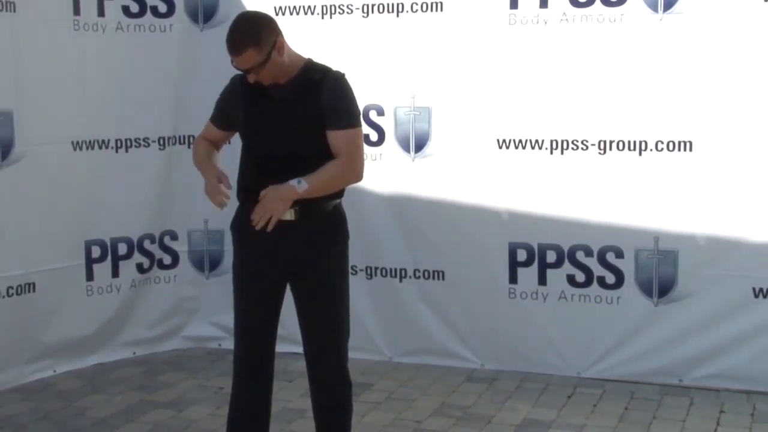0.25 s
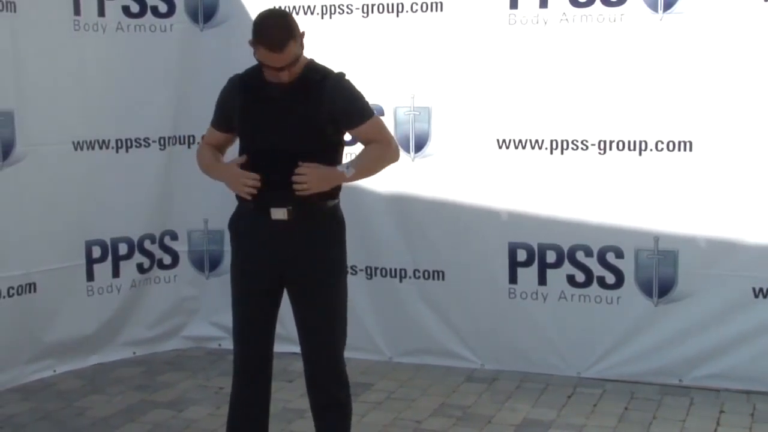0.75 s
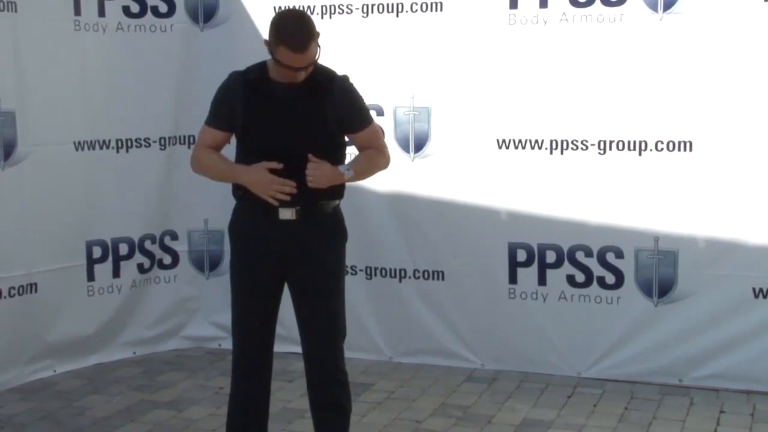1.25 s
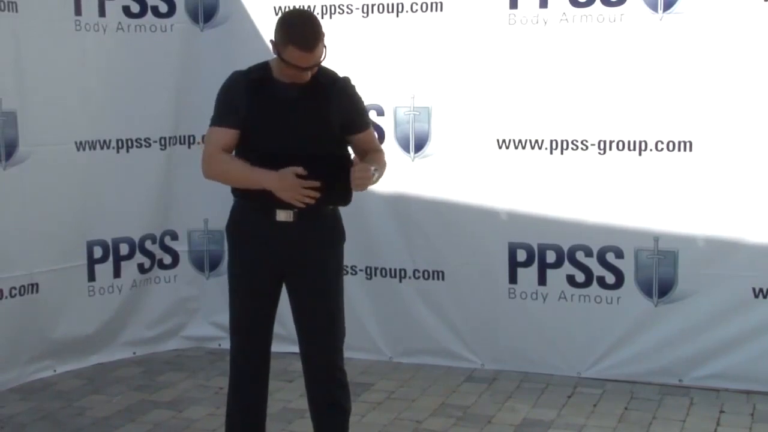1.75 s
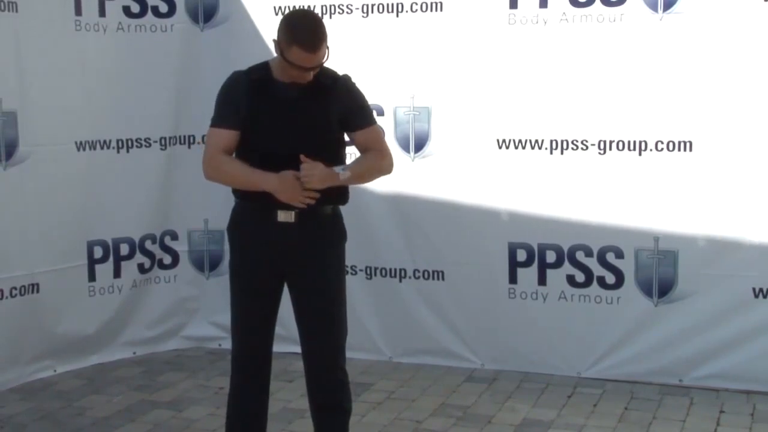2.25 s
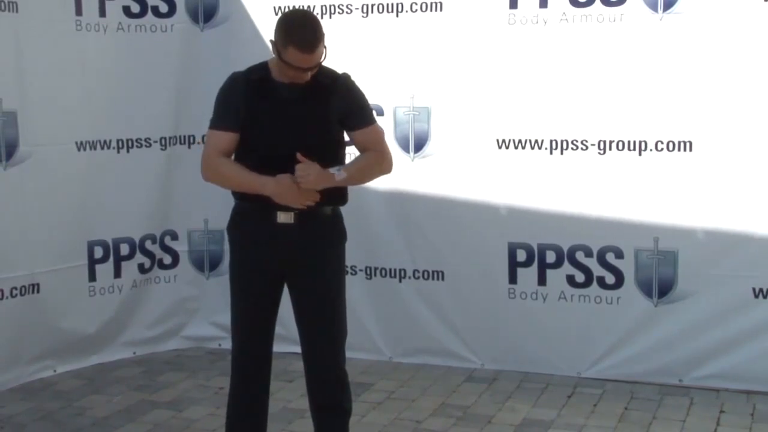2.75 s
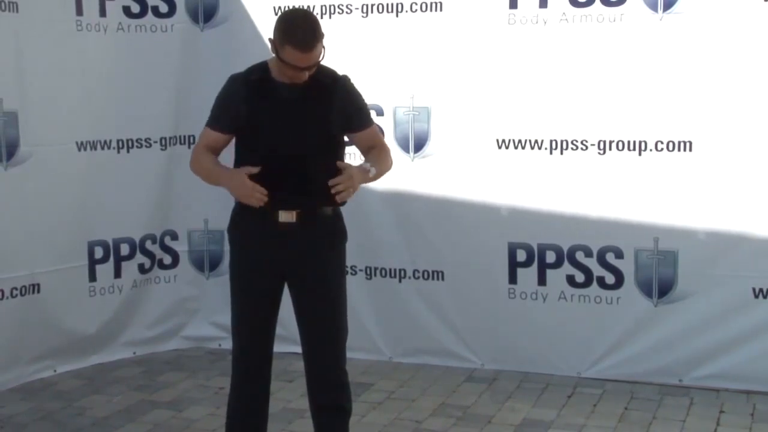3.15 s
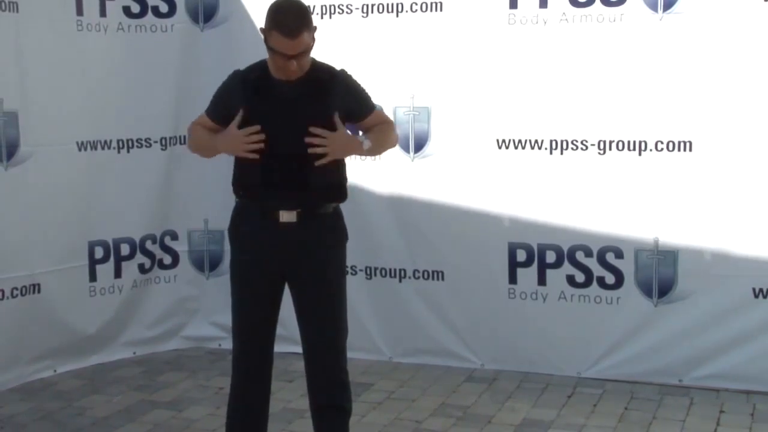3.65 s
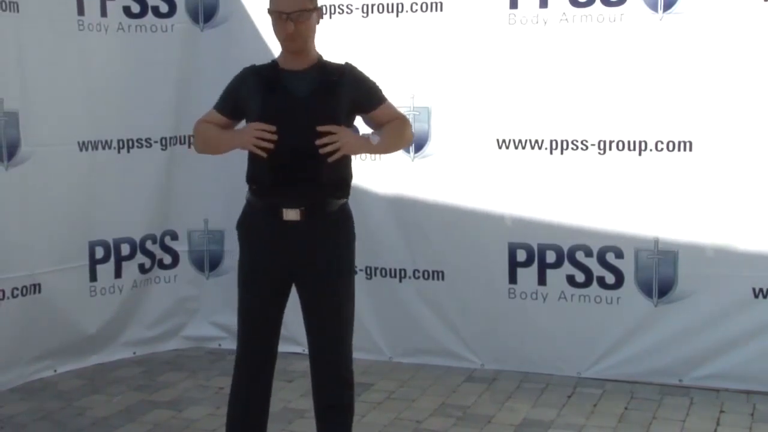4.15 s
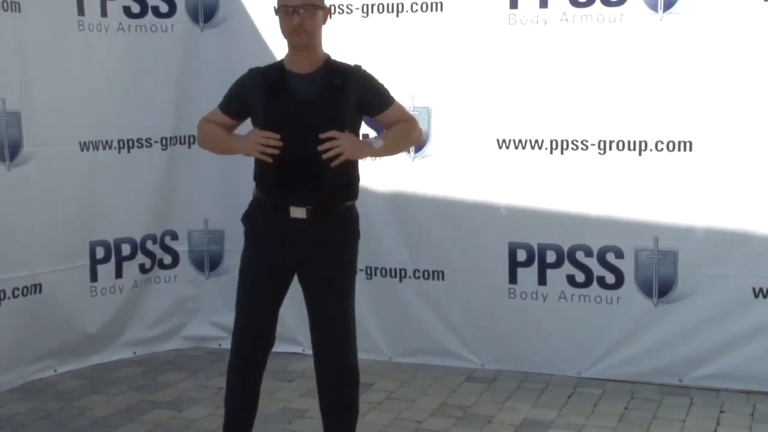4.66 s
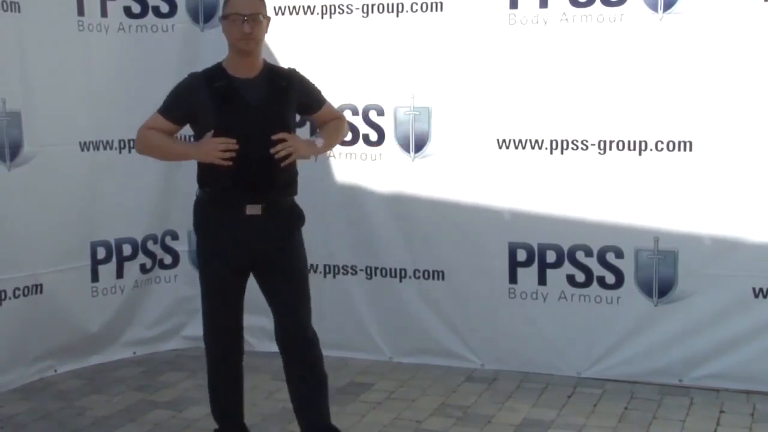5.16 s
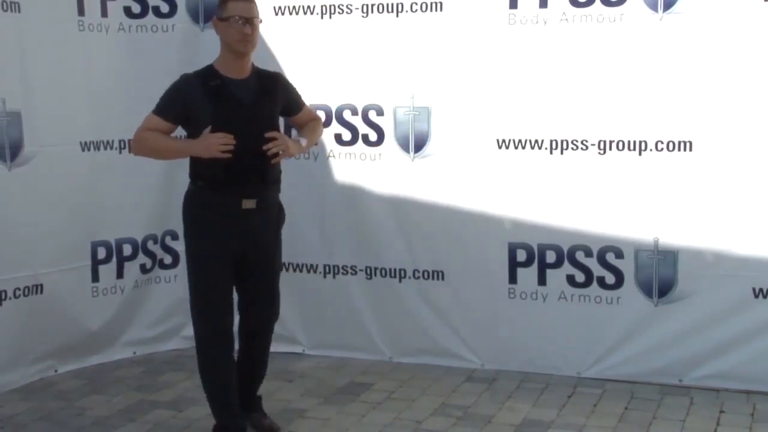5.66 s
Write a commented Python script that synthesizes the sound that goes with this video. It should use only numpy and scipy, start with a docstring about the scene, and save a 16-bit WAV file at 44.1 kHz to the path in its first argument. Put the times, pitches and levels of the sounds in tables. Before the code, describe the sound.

Palms slap a stiff padded vest with hollow thumps, and a hook-and-loop strap crackles and rips open amid knocks, cloth rustle and faint traffic.

```python
"""Palms slap the hollow shell of a stiff padded vest; a hook-and-loop strap is picked loose and ripped open,
knocks fall and cloth rustles, in a paved, tarp-walled corner with far traffic humming.
The shell is a bank of damped sines; strap and cloth are many tiny slips or rings, shaped in spectrum and level.
Echoes and a short tail place hits and tearing in the corner; loud slaps overload the input stage."""
import sys
import numpy as np
from scipy import signal
from scipy.fft import rfft, irfft, next_fast_len
from scipy.io import wavfile
from scipy.ndimage import uniform_filter1d, map_coordinates

SR = 44100
rng = np.random.default_rng(int(sys.argv[2]) if len(sys.argv) > 2 else 0)


def to_wav(sig):
    """Store sig (one row per channel, or 1-D mono) as 16-bit WAV at the path in sys.argv[1].

    Samples outside -1..1 are clipped; the rate is SR.
    """
    pcm = np.clip(np.atleast_2d(sig), -1, 1) * 32767
    pcm = np.round(pcm).astype(np.int16)
    wavfile.write(sys.argv[1], SR, pcm.T)  # frames by channels


N = 260631  # length in samples

# the strap is pulled, slackens and is pulled harder: t/s, hooks level/dB
RIP_PULL = [(1.315, -53), (1.324, -32.5), (1.379, -25), (1.47, -30.5), (1.494, -28.5), (1.499, -22.5),
            (1.54, -23.5), (1.611, -17.5), (1.651, -19), (1.668, -28)]
# sliding and fraying cloth, spectrum before scaling: f/Hz, level/dB per Hz
CLOTH_SPECTRUM = [(880, -15), (1500, -1), (1680, -2.5), (2080, -1), (4860, -0.5), (6870, -2), (7790, -0.5),
                  (12000, -9), (15000, -17.5)]
# foam padding, spectrum before scaling: f/Hz, level/dB per Hz
PADDING_SPECTRUM = [(50, -85.5), (90, -20), (170, -9), (280, -1.5), (400, 2), (650, -2), (1000, -10),
                    (1600, -23), (3000, -22), (8000, -55)]
# small contacts through the microphone, bass cut, rolled off above about 13 kHz: f/Hz, gain/dB
MIC_RESPONSE = [(90, -29), (200, 5), (9000, 2), (12000, 6.5), (14000, -9.5), (16000, -33.5)]


def slaps():
    """The palm pushes, so the shell's ring swells, holds and is choked; skin smacks, padding rasps, the chest thuds."""
    # palm slaps: t/s, ring level/dB, tension/pitch factor, rise time constant/s, hold/s,
    # smack level/dB, padding level/dB, chest thud level/dB
    hits = [(0.572, 0, 1.046, 0.0049, 0.012, -16, -12.5, -20),
            (0.9561, -21, 1.033, 0.0019, 0.0066, -43, -33.5, -59),
            (3.5393, -5.5, 0.915, 0.001066, 0.0032, -13.5, -14, -20.5),
            (3.556, 1.5, 0.93, 0.0005, 0.0063, -17.5, -16.5, -25.5)]
    # modes of the hollow shell: f/Hz before tension, level/dB re ring, t60/s
    modes = [(296, -15, 0.0039), (382.8, 1, 0.0095), (555.2, -15, 0.01), (651, -19.5, 0.0076),
             (863, -14.5, 0.025), (1219, -20, 0.045)]
    # skin on nylon, spectrum before scaling: f/Hz, level/dB per Hz
    skin_spectrum = [(100, -26), (500, -10.5), (1200, 3), (2500, -2.5), (4500, -7), (9000, -8.5),
                     (11500, -13), (14000, -32), (16000, -50.5)]
    thud_t60_s = .05

    ringing, rest = np.zeros(N + SR), np.zeros(N + SR)
    t = np.arange(SR // 4) / SR
    skin = coloured(rng.standard_normal(N), skin_spectrum)
    foam = coloured(rng.standard_normal(N), PADDING_SPECTRUM)
    for s, db, tension, rise, hold, smack_db, padding_db, thud_db in hits:
        at = round(s * SR)
        span = slice(at, at + len(t))
        push = (1 - np.exp(-t / rise)) ** 2
        after = np.maximum(t - hold, 0)  # decay starts only after the hold
        ring = sum(amp(level - 60 * after / t60) * np.sin(2 * np.pi * hz * tension * t)
                   for hz, level, t60 in modes)

        flat = t - 1.7 * rise  # the palm lands flat near the end of the push
        smack_decay = amp(-60 * flat / 0.012) + 0.28 * amp(-60 * flat / 0.085)
        smack = amp(smack_db) * (flat > 0) * smack_decay * skin[span]
        rasp = amp(padding_db - 60 * after / 0.065) * foam[span]
        chest = 0.76 * np.sin(2 * np.pi * 58 * t) + 1.5 * np.sin(2 * np.pi * 128 * t)
        thud = amp(thud_db - 60 * t / thud_t60_s) * chest

        ringing[span] += push * amp(db) * ring
        rest[span] += smack + push * (rasp + thud)
    return ringing[:N], rest[:N]


def rip():
    """Thousands of hooks let go each second, in clumps; larger tufts flap the strap, jerks shake the padding."""
    # tearing hooks, spectrum before scaling: f/Hz, level/dB per Hz
    tear_spectrum = [(700, -64.5), (1800, -19), (3000, -11), (4000, -12), (5500, -9), (8300, -4.5),
                     (10500, -7.5), (12900, -12), (16000, -25)]
    # flapping strap, spectrum before scaling: f/Hz, level/dB per Hz
    strap_spectrum = [(200, -70.5), (500, -18), (800, -10), (1000, -9), (1250, 4.5), (1500, 3), (2200, 4.5),
                      (3200, 0.5), (5000, -7), (9000, -71)]
    # start levels re hooks; both grow as the freed end grows longer
    flap_db, flap_grows_db_per_s = -8, 17
    shake_db, shake_grows_db_per_s = -28, 25.5

    start_s, end_s = RIP_PULL[0][0], RIP_PULL[-1][0]
    share = np.sqrt((end_s - start_s) * SR / N)  # keeps rms 1 within the tearing
    clumps = amp(2.2 * wobble(200) + .8 * wobble(50))
    fine = hooks(per_s=5000, centre_hz=6100, octaves=1.44, cycles=1.93, spread_db=-0.5) * clumps
    tufts = hooks(per_s=1800, centre_hz=1336, octaves=1.8, cycles=1.8, spread_db=2.0) * clumps
    jerks = hooks(per_s=420, centre_hz=348, octaves=1.48, cycles=1.3, spread_db=3.0) * clumps
    tear = share * coloured(fine, tear_spectrum)
    flap = share * coloured(tufts, strap_spectrum)
    shake = share * coloured(jerks, PADDING_SPECTRUM)

    torn_s = np.clip(np.arange(N) / SR - start_s, 0, 1)
    flap_gain = amp(flap_db + flap_grows_db_per_s * torn_s)
    shake_gain = amp(shake_db + shake_grows_db_per_s * torn_s)
    return gains(RIP_PULL, fade=.004) * (tear + flap_gain * flap + shake_gain * shake)


def hooks(per_s, centre_hz, octaves, cycles, spread_db):
    """Each hook that lets go rings a few cycles at its own pitch and size, while the strap tears."""
    start, end = RIP_PULL[0][0] - .01, RIP_PULL[-1][0] + .01
    when, pitch, size, sign = rng.random((int(per_s * (end - start)), 4)).T
    # octaves reaches either way from the centre
    hz = np.minimum(centre_hz * 2 ** (octaves * (2 * pitch - 1)), SR / 3)[:, None]
    t = np.arange(256) / SR
    decay = np.exp(-t * hz * np.log(10) / cycles)  # 20 dB down after this many cycles
    rings = np.sin(2 * np.pi * hz * t) * decay
    size_gain = amp(-spread_db * np.log(1 - .96 * size))
    rings *= (np.sign(sign - .5) * size_gain)[:, None]
    at = ((start + when * (end - start)) * SR).astype(int)[:, None] + np.arange(len(t))
    return np.bincount(at.ravel(), rings.ravel(), N)[:N]


def picking():
    """Fingers pick at the strap's edge; a few rows of hooks part in short crackling runs."""
    # picks: t/s of arrival at full speed, rise/s, hold/s, hooks level/dB
    picks = [(1.018, .03, 0.031, -43), (1.07, .02, 0.038, -45.5), (1.139, .02, 0.021, -45),
             (1.186, .01, .01, -47), (1.219, .01, 0.038, -40.5), (1.306, .003, .013, -41)]
    # parting hooks, spectrum before scaling: f/Hz, level/dB per Hz
    parting_spectrum = [(530, -45), (900, -21), (1170, -6), (1350, -17), (1470, -10), (1930, -9.5),
                        (7590, 1.5), (12400, -13), (15500, -21)]

    slips = crackle(per_s=2500, spread_db=-2, hiss=0.86)
    fizz = coloured(slips * amp(2.0 * wobble(80)), parting_spectrum)
    power = sum(amp(2 * (db + motion_db(s, rise, hold))) for s, rise, hold, db in picks)
    return fizz * np.sqrt(power)


def snaps():
    """A single hook or crease snaps in a broad click round its pitch; neighbouring hooks fray after it."""
    # single hooks and creases: t/s, click level/dB, f/Hz
    clicks = [(0.02, -38, 7020), (0.0842, -42, 6860), (0.205, -43.5, 6820), (0.252, -34.5, 4500),
              (0.2898, -34, 5380), (0.9952, -32, 6700), (1.0085, -32, 6240), (1.019, -27.5, 7100),
              (1.037, -26, 6630), (1.0763, -29, 5740), (1.1036, -31, 8000), (1.1437, -31, 7000),
              (1.1585, -28, 6900), (1.1897, -28, 7500), (1.2188, -30, 5670), (1.2251, -25.5, 7840),
              (1.2368, -27.5, 6506), (1.304, -24.5, 6600), (1.319, -31, 7100), (2.342, -35, 3180),
              (2.429, -44.5, 5100), (2.496, -37.5, 4660), (2.8851, -31, 2840), (2.9966, -42, 6500),
              (3.1002, -27, 4500), (3.319, -42, 8050), (3.84, -43, 2510), (4.0005, -35, 7400),
              (4.9822, -43, 5000), (5.0801, -29.5, 3600), (5.1484, -46, 2800), (5.7198, -29.5, 6400)]
    snap_t60_s, fray_db, fray_t60_s = .0026, -17.5, 0.047  # fray level re click

    out, t = np.zeros(N + SR), np.arange(SR // 10) / SR
    fibres = coloured(crackle(per_s=1000, spread_db=4.5, hiss=.6), CLOTH_SPECTRUM)
    fibres = np.pad(fibres, (0, SR))
    for s, db, hz in clicks:
        at = round(s * SR)
        drift = .35 * np.cumsum(rng.standard_normal(len(t)))  # random phase broadens the pitch
        click = amp(-60 * t / snap_t60_s) * np.sin(2 * np.pi * hz * t + drift)
        fray = amp(fray_db - 60 * t / fray_t60_s) * fibres[at:at + len(t)]
        out[at:at + len(t)] += amp(db) * (click + fray)
    return shaped(out[:N], MIC_RESPONSE)


def knocks():
    """A soft-edged, quickly damped knock; loose parts rattle on round the same pitch."""
    # taps of fingers, buckle and shoes, and jerks of the strap during the rip:
    # t/s, level/dB, f/Hz, cycles to fall 60 dB, rattle level/dB re knock
    contacts = [(.08, -48, 450, 11, -15), (.183, -46, 377, 4.5, -13), (.295, -42.5, 430, 11, -24),
                (1.018, -31.5, 1490, 13, -13), (1.0921, -37.5, 417.4, 9, -17),
                (1.1139, -33.5, 420.4, 9.5, -23), (1.2175, -34, 409.4, 5.5, -19),
                (1.2192, -30.5, 1200, 18, -8), (1.3262, -24, 1134, 6, -13.5), (1.357, -30.5, 410, 9, -13),
                (1.478, -27, 597, 5, -21), (1.659, -20.5, 483, 5.5, -11.5), (1.8469, -32.5, 437, 1.5, -17),
                (1.9234, -36, 464, 2, -12.5), (2.1327, -37.5, 757, 10, -11.5), (2.2304, -28, 1110, 7, -15),
                (2.2708, -35.5, 706, 6, -4.5), (2.3415, -15, 847, 3.5, -17.5), (2.3696, -35, 1193, 2, -7),
                (2.8867, -20, 972.3, 5.5, -21), (2.9365, -33.5, 1467, 1, -12), (2.9534, -28, 350, 1.5, -17),
                (3.8419, -34.5, 476, 3, -7.5), (4.1114, -33, 877, 2, -10.5), (4.153, -36, 430, 8, -8),
                (4.3657, -36, 683, 7, -10), (4.9734, -40, 678, 4.5, -11.5), (5.1398, -16.5, 1178, 9, -14),
                (5.1494, -29, 440, 5, -27), (5.446, -44, 425, 7, 1.5), (5.6972, -27, 300, 3, -19),
                (5.7044, -31.5, 618, 1.5, -5.5), (5.8658, -20, 992, 6, -12)]
    rattle_t60_s = 0.053
    rise_share = 0.0461  # rise time constant over ring time

    out, t = np.zeros(N + SR), np.arange(SR // 10) / SR
    for s, db, hz, cycles, rattle_db in contacts:
        ring_s = cycles / hz
        drift = hz / 4000 * np.cumsum(uniform_filter1d(rng.standard_normal(len(t)), size=20))
        knock = amp(-60 * t / ring_s) * np.sin(2 * np.pi * hz * t)
        swell = np.minimum(3.2 * t / ring_s, 1) ** 2
        rattle_decay = amp(rattle_db - 60 * t / rattle_t60_s)
        rattle = swell * rattle_decay * np.sin(2 * np.pi * hz * t + drift)
        soft_edge = (1 - np.exp(-t / (rise_share * ring_s))) ** 2
        out[round(s * SR):][:len(t)] += amp(db) * soft_edge * (knock + rattle)
    return shaped(out[:N], MIC_RESPONSE)


def handling():
    """Cloth slides in small uneven slips; the shell murmurs under the hands."""
    # hand strokes: t/s of arrival at full speed, rise/s, hold/s, cloth hiss level/dB, rubbed shell level/dB
    strokes = [(0.085, .01, 0.058, -54.5, -70), (.205, .02, .01, -60, -73), (.254, .006, 0.0485, -50, -54),
               (0.484, 0.055, .02, -65, -68), (0.955, 0.026, 0.019, -46.5, -46.5),
               (1.023, 0.033, 0.25, -57, -58), (2.015, 0.029, 0.023, -61, -54.5),
               (2.284, 0.15, 0.056, -58, -49), (2.36, .01, 0.046, -62, -57),
               (2.493, .002, 0.013, -51.5, -68), (2.623, .03, .02, -61.5, -55),
               (2.898, .005, 0.067, -56, -56), (2.995, .02, .1, -51, -62.5),
               (3.098, .002, 0.0096, -48.5, -52.5), (3.32, 0.039, .03, -71.5, -78.5),
               (3.539, 0.0033, .004, -34, -40), (3.836, 0.026, 0.0136, -61, -60.5),
               (3.998, .005, 0.092, -61, -64), (4.13, 0.12, 0.076, -50, -50),
               (4.286, 0.165, 0.094, -49, -50.5), (4.452, 0.028, .08, -54.5, -53),
               (4.593, .02, 0.084, -60.5, -58), (4.837, 0.071, 0.073, -63.5, -62),
               (4.977, .01, 0.025, -55, -50.5), (5.077, .005, .02, -56, -58),
               (5.15, .005, 0.048, -62.5, -56.5), (5.31, 0.046, 0.14, -68, -58),
               (5.446, 0.011, 0.11, -65, -56.5), (5.695, .005, .02, -50.5, -55),
               (5.724, 0.022, 0.013, -43, -47.5), (5.896, 0.0177, .03, -57, -51)]
    # rubbed shell, spectrum before scaling: f/Hz, level/dB per Hz
    rub_spectrum = [(110, -60), (180, -18), (430, 2), (529, -5.5), (770, -4.5), (1130, -5.5), (1540, -9.5),
                    (2500, -12.5), (3250, -21.5), (5500, -120)]

    slips, nudges = 1.5 * wobble(60), 2.2 * wobble(35)  # uneven levels in dB
    cloth = coloured(crackle(per_s=3800, spread_db=-0.5, hiss=1.0) * amp(slips), CLOTH_SPECTRUM)
    rub = coloured(crackle(per_s=220, spread_db=0.5, hiss=0.77) * amp(nudges), rub_spectrum)
    power = np.zeros((2, N))
    for s, rise, hold, cloth_db, rub_db in strokes:
        power += amp(2 * motion_db(s, rise, hold)) * amp([[2 * cloth_db], [2 * rub_db]])
    return np.sqrt(power[0]) * cloth + np.sqrt(power[1]) * rub


def motion_db(s, rise, hold):
    """A hand speeds up, holds its speed and slows down: level re full speed."""
    range_db, fade_db_per_s = 18.5, 300  # climbed during the rise; lost after the hold
    t = np.arange(N) / SR
    return -range_db * np.maximum(s - t, 0) / rise - fade_db_per_s * np.maximum(t - s - hold, 0)


def traffic():
    """Wavering engine bass under a steady wash of tyres and wind, both shaped noise."""
    # engine bass over time: t/s, level/dB
    rumble = [(0.0, -47.5), (0.25, -57.5), (1.5, -57), (3.2, -52), (3.8, -56), (4.45, -52), (4.8, -56),
              (5.91, -52)]
    # engines, spectrum before scaling: f/Hz, level/dB per Hz
    engine_spectrum = [(12, -33.5), (20, -2), (59, 3.5), (71, 3.5), (156, -12.5), (200, -14.5),
                       (260, -58.5), (440, -120)]
    # tyres and wind, spectrum before scaling: f/Hz, level/dB per Hz
    air_spectrum = [(88, -29), (150, -1), (221, -1), (425, -2), (578, -2), (1070, -2.5), (2140, -13),
                    (7790, -15.5), (13400, -26), (14200, -28.5), (15000, -45)]
    air_db = -57

    bass = coloured(rng.standard_normal(N), engine_spectrum) * amp(1.4 * wobble(3.0))
    wash = coloured(rng.standard_normal(N), air_spectrum) * amp(0.18 * wobble(7.7))
    return gains(rumble, fade=.01) * bass + amp(air_db) * wash


def corner(x, wet_db, echoes):
    """A few early echoes, then a tail dying band by band, a new one for each third of a second."""
    # decay of the corner: f/Hz, t60/s
    decay_times = [(100, 0.38), (400, .36), (2000, 0.26), (6000, 0.36), (12000, 0.25)]

    out, step = np.pad(x, (0, SR)), SR // 3
    for s, db in echoes:
        out[round(s * SR):][:N] += amp(db) * x
    for start in range(0, N, step):
        hz, t, bands = signal.stft(rng.standard_normal(SR // 2), SR, nperseg=256)
        decay = amp(-60 * t / along(decay_times, hz)[:, None])
        tail = signal.istft(bands * decay, SR, nperseg=256)[1]
        wet = signal.fftconvolve(x[start:start + step], tail / np.linalg.norm(tail))
        out[start + 300:][:len(wet)] += amp(wet_db) * wet  # tail enters 300 samples late
    return out[:N]


def crackle(per_s, spread_db, hiss):
    """Random slips of unequal, bounded size on a bed of hiss."""
    size_db = spread_db * np.minimum(rng.exponential(size=N), 3)
    slips = (rng.random(N) < per_s / SR) * rng.uniform(-1.16, 1, N) * amp(size_db)
    return unit(slips) + hiss * rng.standard_normal(N)


def wobble(rate):
    """A smooth random curve, rate knots a second."""
    return map_coordinates(rng.standard_normal(int(N * rate / SR) + 4), [np.arange(N) * rate / SR])


def gains(rows, fade):
    """Gain per sample from (s, dB) rows, fading to -110 dB within fade seconds beyond their ends."""
    s, db = np.transpose(rows)
    times, levels = np.r_[s[0] - fade, s, s[-1] + fade], np.r_[-110, db, -110]
    return amp(np.interp(np.arange(N) / SR, times, levels))


def coloured(x, spectrum):
    """x shaped by a spectrum and scaled to rms 1."""
    return unit(shaped(x, spectrum))


def shaped(x, spectrum):
    """x through a (Hz, dB) spectrum."""
    m = next_fast_len(N + 8192)
    return irfft(rfft(x, m) * amp(along(spectrum, np.fft.rfftfreq(m, 1 / SR))), m)[:N]


def along(points, hz):
    """(Hz, value) points read on a log frequency axis."""
    f, v = np.transpose(points)
    return np.interp(np.log(hz + 1), np.log(f + 1), v)


def unit(x):
    """x scaled to rms 1."""
    return x / np.sqrt(np.mean(x ** 2) + 1e-20)


def amp(db):
    """Gain of a level in dB."""
    return 10 ** (np.asarray(db) / 20)


def scene():
    """Hits and tearing sound in the corner, over picking, rustle and traffic."""
    # early echoes off paving and tarps: delay/s, level/dB
    echoes = [(.0027, -12.5), (.0075, -12), (.013, -14), (0.03, -19)]

    ringing, rest = slaps()
    # of the low ring only the far walls answer
    shell = corner(ringing, wet_db=-24.5, echoes=echoes[2:])
    contacts = corner(rest + knocks() + snaps(), wet_db=-11.0, echoes=echoes)
    tearing = corner(rip(), wet_db=-9.0, echoes=echoes)
    return (shell + contacts + tearing + picking() + handling() + traffic())[None]


def record(dry):
    """The input stage clips softly; nothing is kept above the band limit."""
    ceiling, top_hz = .62, 15900  # ceiling in full-scale amplitude
    clipped = dry / (1 + np.abs(dry / ceiling) ** 5) ** (1 / 5)
    m = next_fast_len(N + 8192)
    edge = np.clip((top_hz - np.fft.rfftfreq(m, 1 / SR)) / 500, 0, 1)  # 500 Hz slope below the limit
    return irfft(rfft(clipped, m) * edge, m)[:, :N]


dry = scene()
out = record(dry)
to_wav(out)
```